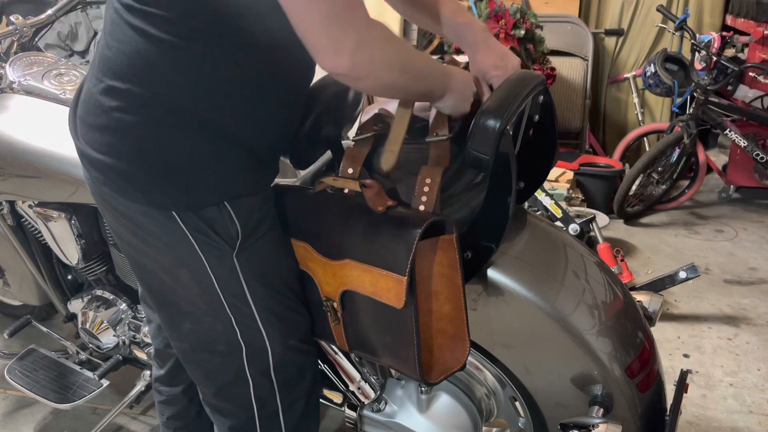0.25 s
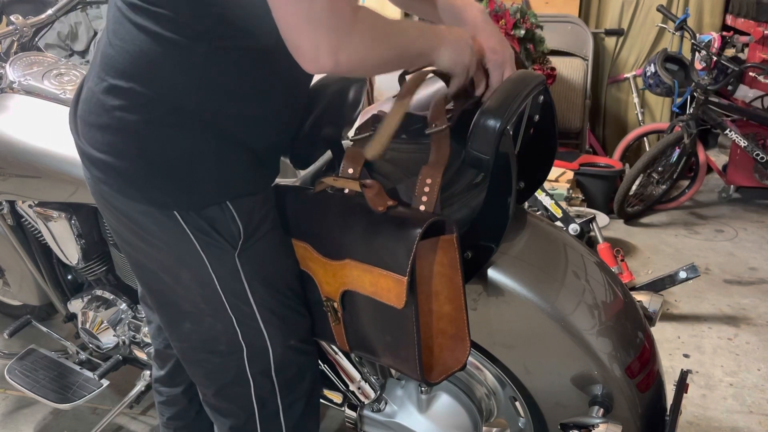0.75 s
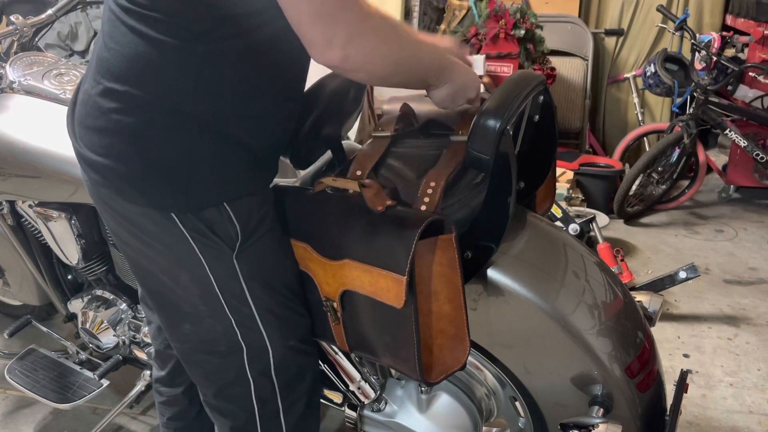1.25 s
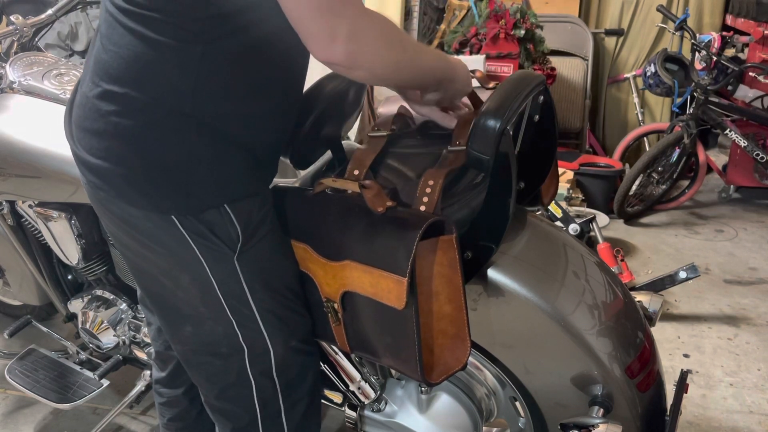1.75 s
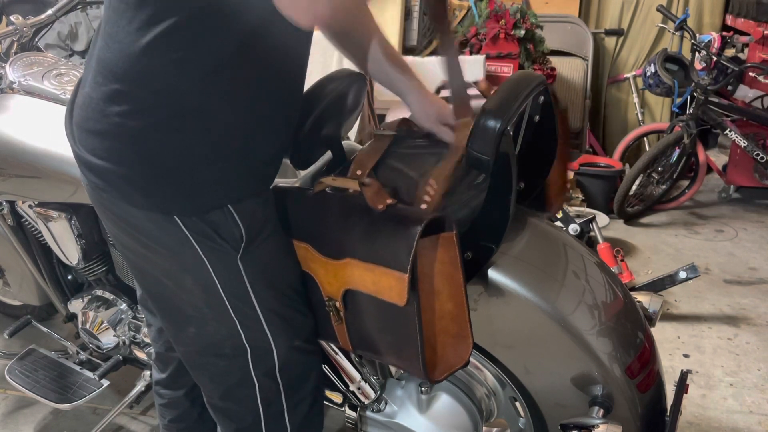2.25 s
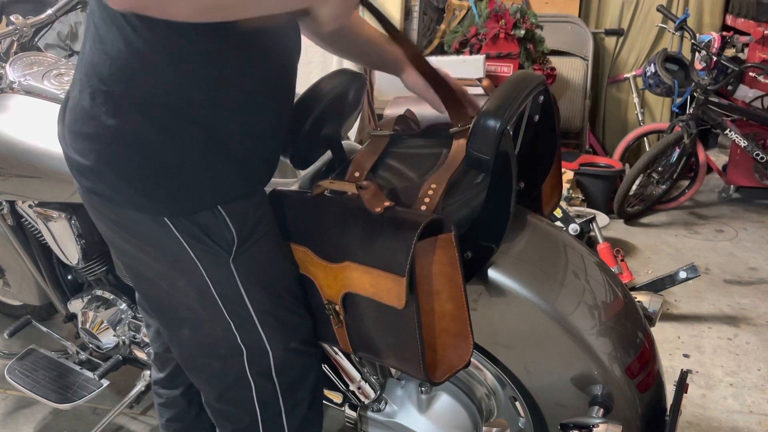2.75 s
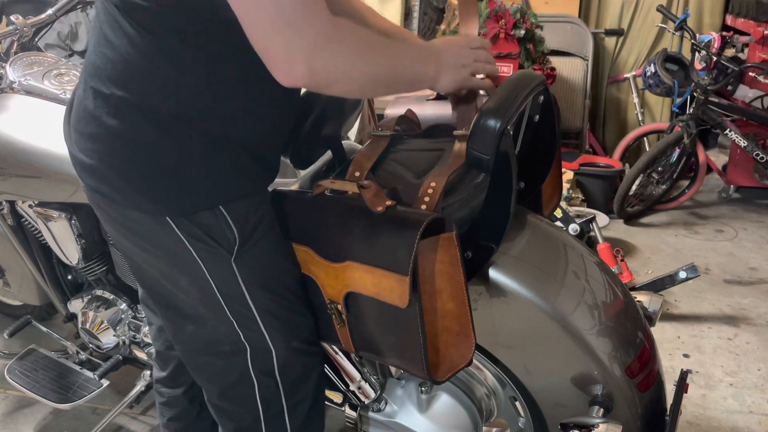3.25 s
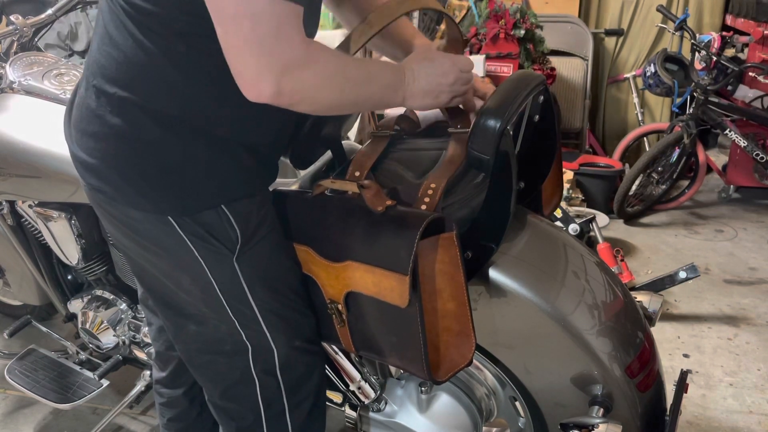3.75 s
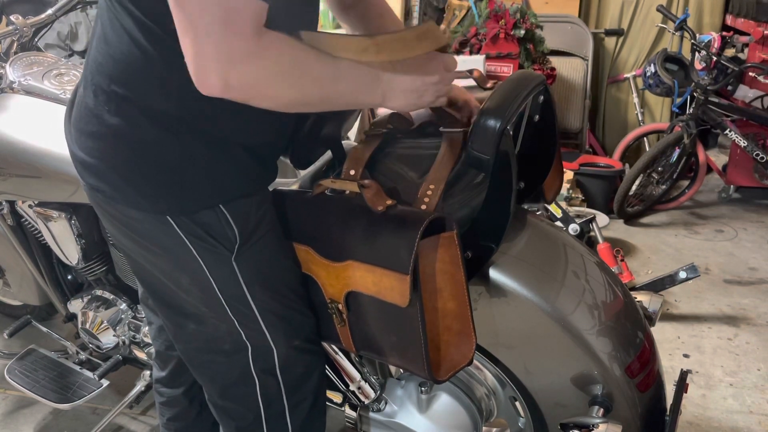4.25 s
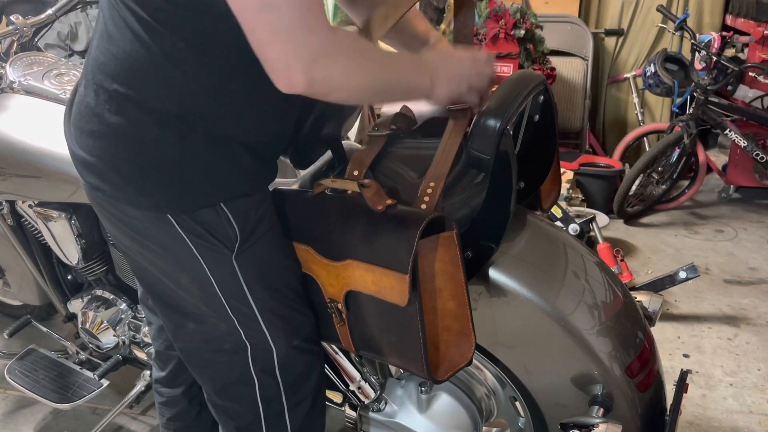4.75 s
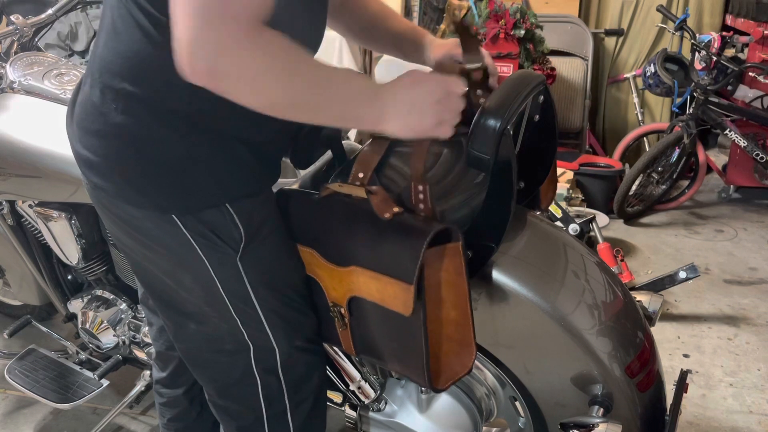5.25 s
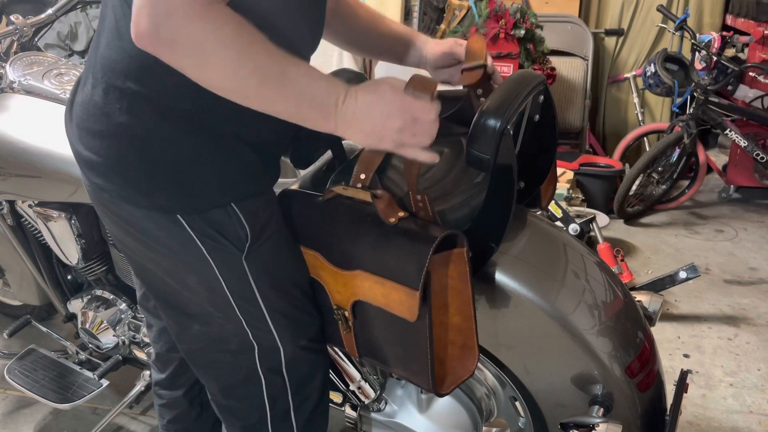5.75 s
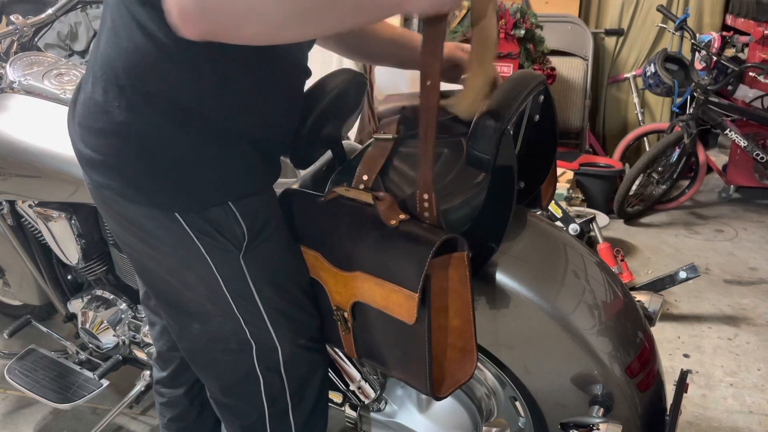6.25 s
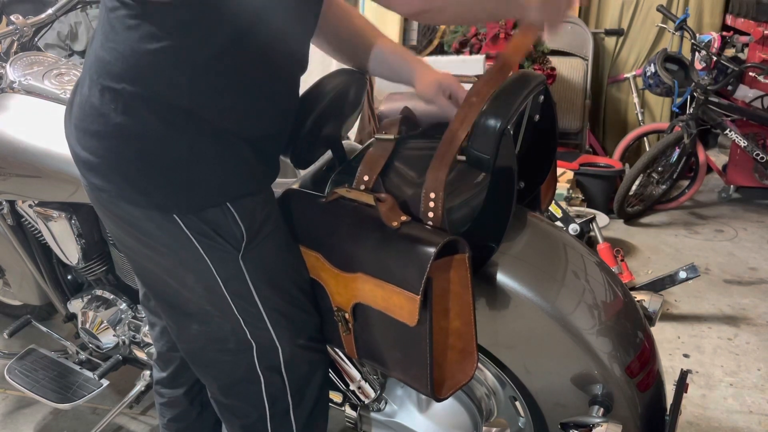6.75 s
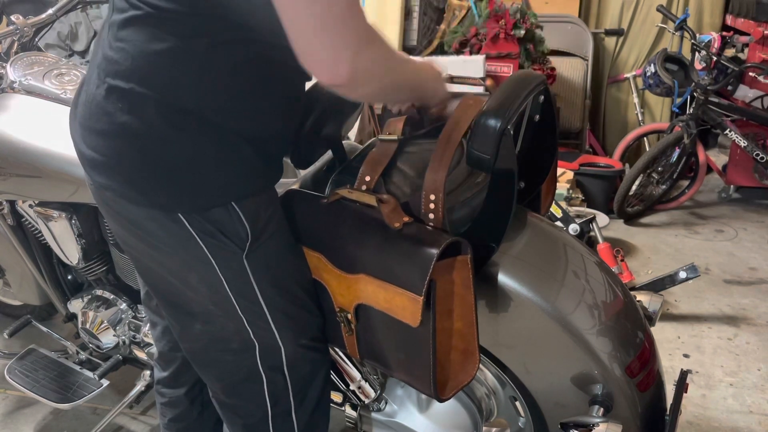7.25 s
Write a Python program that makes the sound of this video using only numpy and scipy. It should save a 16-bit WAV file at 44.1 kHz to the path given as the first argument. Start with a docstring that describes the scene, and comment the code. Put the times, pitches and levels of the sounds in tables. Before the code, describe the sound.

Soft leather rubbing and light buckle clinks open the scene, heard from a metre or two away in a quiet garage. A cluster of hollow thumps and jingles follows as the bag is handled, then dry creaks from a strap being pulled loose. Steel fittings chatter brightly before a flung buckle snaps against the bag, with a last few clinks. A faint hum lies underneath, and each sound has a short echo.

```python
"""Leather rustles and bumps softly over a faint garage hum: a bag is being unstrapped from a parked
motorcycle, a metre or two from a phone. The steel buckle rings as its tongue strikes it, the strap
creaks and rasps in stick-slip, small fittings clatter and the hollow bag thuds and slaps. Near the end
the buckle is flung against the bag with a sharp snap. The cluttered room gives each sound a short tail."""
import sys
import numpy as np
from scipy import signal
from scipy.fft import rfft, irfft
from scipy.io import wavfile

SR = 44100
rng = np.random.default_rng(int(sys.argv[2]) if len(sys.argv) > 2 else 0)


def dump(signal):
    """Clip the signal to [-1, 1] and save it as 16-bit WAV at the path in sys.argv[1]."""
    limited = np.clip(np.atleast_2d(signal).T, -1, 1)
    pcm = np.round(limited * 32767).astype(np.int16)
    wavfile.write(sys.argv[1], SR, pcm)


N = 331191
T = np.arange(N) / SR
HIT_T = T[:SR // 3]

# Levels in the tables are relative; each layer adds its own trim.
# steady tones in the room: f/Hz, level/dB
HUM = [(122.5, -82.5), (287, -91)]
# colour of the still air: f/Hz, level/dB
AIR = [(12, -38), (20, -1.5), (49, -2), (142, -10.5), (210, -15), (527, -10), (624, -16.5), (1290, -27.5),
       (3250, -33), (3950, -31), (14300, -34), (16000, -47.5)]
# leather and cloth rub as the hands work: t/s, dull rustle/dB, dry hiss/dB
RUB_LEVELS = [(0.0, -63, -67.5), (0.1, -69.5, -73), (0.23, -71, -75), (0.46, -68.5, -72),
              (0.81, -69.5, -74), (0.94, -60.5, -66.5), (1.05, -66, -75), (1.11, -55.5, -56),
              (1.29, -64, -73), (1.57, -68, -74.5), (1.82, -66.5, -68.5), (2.03, -63.5, -72),
              (2.17, -57, -53), (2.28, -44, -52), (2.32, -57.5, -58), (2.47, -60.5, -74.5),
              (2.57, -82, -69), (2.7, -72.5, -70), (2.84, -69.5, -72), (3.09, -77.5, -87),
              (3.3, -68, -74.5), (3.47, -70.5, -76), (3.68, -75, -68.5), (4.08, -62, -67.5),
              (4.22, -75.5, -74), (4.48, -70, -75), (4.79, -69, -72), (5.04, -65, -67),
              (5.17, -59.5, -51.5), (5.31, -64, -70), (5.46, -69.5, -54), (5.56, -78.5, -68),
              (5.77, -72.5, -71), (5.92, -65, -62), (6.28, -79.5, -75.5), (6.52, -63.5, -73),
              (6.67, -67, -67), (6.76, -66, -70.5), (6.86, -67.5, -61.5), (7.05, -75, -78.5),
              (7.3, -75.5, -87.5), (7.51, -87, -81)]
# colour of the flexing folds: f/Hz, level/dB
RUSTLE = [(60, -22), (150, -6), (240, -0.5), (282, 7.5), (330, -1.5), (420, -2), (700, -5), (1300, -10),
          (3000, -38)]
# colour of the scraping grain: f/Hz, level/dB
HISS = [(500, -10), (1300, -1.5), (3000, 2.5), (5000, -1), (7000, -8), (9000, -8.5), (12000, -22.5),
        (16000, -24)]
# leather and hands bump the bag: t/s, level/dB, hardness (slap over thud)/dB, thud f/Hz
BUMPS = [(0.002, -53.5, -14, 250), (0.219, -51.5, -3.5, 351), (0.412, -60.5, -21, 330),
         (0.781, -55.5, -7, 408), (0.806, -49.5, -9.5, 516), (1.096, -49.5, -1.5, 307),
         (1.146, -56, 6, 320), (1.402, -63, -21, 343), (1.771, -66, -12.5, 288), (1.924, -57.5, -13, 315),
         (2.142, -33, -2, 278), (2.152, -39.5, 9, 285), (2.167, -34, -5, 280), (2.206, -41.5, 7, 260),
         (2.232, -42, -8, 288), (3.584, -57.5, -10, 298), (3.704, -56, 3, 228), (4.143, -54, -1, 370),
         (4.593, -57.5, -9, 294), (5.039, -47, -3, 271), (5.111, -65, 15, 276), (5.286, -50, 6, 368),
         (5.351, -55.5, 1, 325), (5.625, -58.5, -16.5, 256), (6.096, -58, -6.5, 327),
         (6.232, -48, -4.5, 476), (6.264, -53.5, 5.5, 270), (6.521, -42, 2.5, 290), (6.587, -53, -8, 288),
         (6.836, -43, 8.5, 279), (7.262, -54.5, -7.5, 359)]
# modes of the bag's hollow body, then its flap: f/Hz, level/dB
BAG_MODES = [
    [(125, -11), (185, -3.5), (245, -7.5), (285, 0.5), (360, -3)],
    [(420, 3.5), (520, -6), (640, 3.5), (780, -14.5)],
]
# noise colours of body, flap and slap: f/Hz, level/dB
BAG_COLOURS = [
    [(40, -10), (110, -13), (180, -14), (270, 6), (380, -7), (600, -22.5), (1500, -48.5)],
    [(200, -15.5), (400, 5), (650, 9), (900, -11.5), (1600, -40)],
    [(450, -19), (1050, -6), (1600, -11.5), (2700, -10.5), (4200, -15.5), (10000, -26.5)],
]
# the tongue strikes the buckle frame: t/s, level/dB, brightness (top over low modes)/dB
STRIKES = [(0.004, -61.5, -1), (0.573, -54, -12), (0.588, -50, -16.5), (0.646, -56, -21),
           (0.859, -42.5, -16.5), (0.887, -41, -11), (1.034, -54.5, 2.5), (1.104, -50.5, 17),
           (1.117, -45, -13.5), (1.226, -43, -5.5), (1.261, -47, 3.5), (2.091, -66, 15), (2.151, -42.5, 2),
           (2.166, -39, 6), (2.191, -39.5, -4), (2.229, -39.5, -8), (2.25, -40.5, -19), (4.454, -74, -25.5),
           (4.505, -76, -20), (5.173, -45.5, 9), (5.882, -54, -12), (5.907, -46, -15),
           (5.928, -44.5, -14.5), (6.21, -64, -9), (6.544, -42.5, 1), (6.587, -59, -33), (6.796, -63, -9),
           (6.835, -47, -9), (6.862, -43.5, 1), (6.884, -41, -3)]
# modes of the buckle frame: f/Hz, level/dB, t60/s, group (0 low, 1 middle, 2 top)
BUCKLE_MODES = [(3957, 0, .3, 0), (4075, -14, .09, 0), (5335, -5, .35, 1), (8696, 0, .3, 1),
                (9990, -6, .3, 1), (13250, -14, .06, 2), (13750, 0, .25, 2), (14680, -8, .3, 2)]
# the strap slips once under tension: t/s, level/dB
CREAKS = [(0.056, -45), (0.096, -44), (0.1924, -44), (0.236, -51), (0.29, -52), (0.992, -44), (1.081, -47),
          (1.146, -43), (1.189, -38.5), (1.6275, -44.5), (1.9333, -42.5), (1.973, -38), (2.044, -41),
          (2.1216, -40), (2.1289, -29.5), (2.7684, -48.5), (2.798, -45), (2.8461, -45), (3.021, -50),
          (3.068, -43), (3.205, -45.5), (3.262, -40), (3.309, -47.5), (3.4376, -47), (3.465, -47),
          (3.5226, -29.5), (3.585, -24.5), (3.866, -46.5), (3.983, -31.5), (4.153, -40), (4.2582, -47),
          (4.7362, -48)]
# a steady pull makes it slip again and again: t/s, length/s, level/dB
PULLS = [(2.415, .085, -39), (3.889, .085, -38)]
# colour of a slip's dry tick: f/Hz, level/dB
SLIP_TICK = [(900, -48), (2200, -3), (4200, 5), (6500, -6.5), (8500, -7), (11000, -16), (15500, -28)]
# colour of the stiff strap's knock: f/Hz, level/dB
SLIP_BODY = [(150, -31), (350, -1), (700, -2), (1200, 1), (2200, -4.5), (4000, -20.5)]
# strap fittings knock together: t/s, level/dB, brightness/dB, clink f/Hz
CLACKS = [(0.5885, -43.5, -5, 5030), (0.861, -42, 2, 4300), (0.89, -47, 6, 4430), (1.0053, -53, -9, 4600),
          (1.119, -49.5, 6, 4400), (2.091, -51, 0, 4730), (2.165, -35.5, 1.5, 4230), (2.174, -51, 19, 4500),
          (2.208, -30.5, 5.5, 4160), (4.857, -46, -9, 4130), (4.9995, -36.5, 0.5, 5000),
          (5.027, -31, -29, 5030), (5.037, -45, 1.5, 5500), (5.044, -29.5, -5.5, 5080),
          (5.05, -33.5, 5, 5740), (5.103, -29.5, 6, 4500), (5.112, -32, 6, 5140), (5.127, -40, -18, 5100),
          (5.138, -30, 5, 4580), (5.172, -40.5, 9, 4870), (5.193, -31, 5, 4470), (5.203, -31.5, 2, 4900),
          (5.2385, -35.5, -5, 4990), (5.395, -38.5, -11, 4900), (5.404, -36, -19, 5260),
          (5.412, -28, -5.5, 5010), (5.45, -37.5, 1, 4930), (5.4595, -31, -17, 4910),
          (5.7544, -38.5, -10, 5130), (5.769, -57, 4, 5200), (5.841, -55, 4, 5280),
          (5.909, -42.5, 5.5, 4150), (6.591, -38, -4, 4090), (6.837, -37, 3.5, 4270)]
# loose fittings chatter: t/s, length/s, level/dB, clink f/Hz
RATTLES = [(2.15, .08, -56, 4280), (5.066, .155, -42, 4900), (5.416, .05, -50, 5230),
           (6.53, .05, -41, 4100)]
# a knock's four bands (crunch, clink, bright, top): level/dB, dB gained per dB of brightness
CLACK_BANDS = [(-13, -0.1), (5, 0), (-4.5, 0.45), (-12.5, 1.83)]
# modes of the fittings in each band: f/Hz, level/dB
FITTING_MODES = [
    [(1850, -6.5), (2350, -15.5), (3300, -8)],
    [(4150, -40.5), (4680, -63), (4930, 4.5), (5140, 6), (5470, 15), (6050, -7)],
    [(7950, -1.5), (8520, 22), (8780, 17), (9350, -20)],
    [(13250, -11.5), (13770, 17), (14200, -10), (14750, -8)],
]
# colour of the contact grit in each band: f/Hz, level/dB
GRIT = [
    [(400, -33.5), (1000, -1.5), (3000, -17), (4500, -10)],
    [(2600, -27), (4100, -8.5), (5200, 5), (6200, -4), (7500, -22)],
    [(5500, -24.5), (7800, 3), (8800, 5), (10000, -8.5), (12500, -37.5)],
    [(9000, -8.5), (12000, 4), (13800, -5.5), (16000, -36)],
]
# the strap drags through its keeper: t/s, length/s, level/dB, slips per s
DRAGS = [(1.652, 0.14, -61, 115), (4.303, 0.22, -73, 160)]
# colour of the strap's rasp: f/Hz, level/dB
RASP = [(1200, -13), (1800, -1), (2150, -15), (3200, 2.5), (4000, -10), (5900, -1), (6600, -16),
        (8600, -12), (15000, -45)]
# the flung buckle lands and chatters: t/s, level/dB
SNAPS = [(6.5223, -17), (6.5239, -10), (6.5251, -23)]
# colour of steel on steel: f/Hz, level/dB
STEEL_SNAP = [(300, -14.5), (1100, -9), (2000, -25.5), (5000, -4), (7000, -10.5), (8700, -0.5),
              (11000, -14.5), (13500, 6), (15500, -14)]
# decay of the garage: f/Hz, t60/s
GARAGE_T60 = [(125, 1), (500, 0.54), (2000, 0.27), (5000, 0.29), (9000, 0.2656), (15000, 0.25)]

CLINK_HZ, THUD_HZ = 5100, 285  # pitches at which the mode tables play untransposed


def undb(db):
    """Decibels to gain."""
    return 10 ** (np.asarray(db) / 20)


def unit(x):
    """Scale to rms 1."""
    return x / np.sqrt(np.mean(x ** 2))


def unit_attack(x, length_s=0.0073):
    """Scale so that the first milliseconds have rms 1."""
    return x / np.sqrt(np.mean(x[:int(length_s * SR)] ** 2))


def at_hz(points, hz):
    """Read (Hz, value) points on a log-frequency axis."""
    f, value = np.transpose(points)
    return np.interp(np.log(np.maximum(hz, 1)), np.log(f), value)


def pitched(points, ratio):
    """Transpose (Hz, dB) points by a ratio."""
    return [(hz * ratio, db) for hz, db in points]


def colour(x, points, size=2048):
    """Minimum-phase EQ through (Hz, dB) points."""
    cepstrum = irfft(np.log(undb(at_hz(points, np.fft.rfftfreq(size, 1 / SR)))))
    cepstrum[1:size // 2] *= 2
    cepstrum[size // 2 + 1:] = 0
    return signal.fftconvolve(x, irfft(np.exp(rfft(cepstrum))))[:len(x)]


def wander(rate):
    """Smooth random drift with a spread near 1."""
    return np.interp(T * rate, np.arange(N), rng.standard_normal(N))


def add(track, s, sound):
    """Mix a sound in at time s."""
    i = max(0, int(s * SR))
    track[i:i + len(sound)] += sound[:N - i]


def fade(t60):
    """Exponential decay over the length of one hit."""
    return np.exp(-np.log(1000) * HIT_T / t60)


def press(rise_s):
    """A cushioned contact takes a moment to reach full force."""
    return 1 - np.exp(-HIT_T / rise_s)


def burst(points, t60):
    """A contact: coloured, decaying noise with the energy of its envelope."""
    shaped = colour(rng.standard_normal(len(HIT_T)) * fade(t60), points)
    return shaped * np.linalg.norm(fade(t60)) / np.linalg.norm(shaped)


def mode(hz, t60):
    """One decaying vibration, starting from rest."""
    return rng.choice([-1, 1]) * np.sin(2 * np.pi * hz * HIT_T) * fade(t60)


def clang(modes, t60, detune, scatter_db):
    """A set of (Hz, dB) modes, detuned and weighted anew by each blow."""
    ring = 0
    for hz, db in modes:
        gain = undb(db + scatter_db * rng.standard_normal())
        ring += gain * mode(hz * (1 + detune * rng.standard_normal()), t60)
    return unit_attack(ring)


def uneven_times(length, gap_s, jitter):
    """Times of an unevenly repeating contact, from 0 up to length s."""
    gaps = gap_s * np.exp(jitter * rng.standard_normal(size=100))
    times = np.cumsum(gaps) - gaps[0]
    return times[times < length]


def grains(rate, spread_db):
    """Tiny random slips, mostly weak and a few stronger."""
    impulses = (rng.random(N) < rate / SR) * rng.choice([-1, 1], N)
    return impulses * undb(spread_db * np.minimum(rng.exponential(size=N), 5))


def room_tone(air_db=-72, waver_db=2):
    """The bed: still air and a faint wavering hum."""
    hum = sum(undb(db + waver_db * wander(4.3)) * unit(np.sin(2 * np.pi * hz * T + wander(1.6)))
              for hz, db in HUM)
    return hum + undb(air_db) * unit(colour(rng.standard_normal(N), AIR))


def rubbing(rustle_db=-1, hiss_db=1, uneven_db=3.5):
    """Folds flex with a dull rustle while the leather's grain scrapes, both in fits and starts."""
    times, rustle, hiss = np.transpose(RUB_LEVELS)
    fits_db = uneven_db * wander(35)
    folds = unit(colour(grains(rate=350, spread_db=0.5), RUSTLE))
    folds *= undb(np.interp(T, times, rustle) + rustle_db + fits_db)
    scrape = unit(colour(grains(rate=1400, spread_db=1.5), HISS))
    scrape *= undb(np.interp(T, times, hiss) + hiss_db + fits_db)
    return folds + scrape


def bumps(hollow_db=-3, flap_db=-4, crumple_db=-5, hollow_t60=0.063, flap_t60=0.034):
    """The bag thuds at a pitch set by where it is hit, its flap knocks; harder blows slap more."""
    out = np.zeros(N)
    for s, blow_db, hard_db, hz in BUMPS:
        slap = undb(hard_db / 2) * burst(BAG_COLOURS[2], t60=0.071)
        hollow = (hollow_db - hard_db / 2, hollow_t60, hz / THUD_HZ)
        flap = (flap_db, flap_t60, 1)
        thud = 0
        for (db, t60, ratio), modes, outline in zip((hollow, flap), BAG_MODES, BAG_COLOURS):
            tone = clang(pitched(modes, ratio), t60, detune=0.075, scatter_db=3)
            crumple = undb(crumple_db) * burst(pitched(outline, ratio), t60)
            thud += undb(db) * (tone + crumple)
        add(out, s, undb(blow_db) * press(rise_s=0.0007) * (slap + thud))
    return out


def buckle(low_db=3, middle_db=-2, top_db=5.5, free_s=0.023, choke_db=-20, pivot_hz=8000, detune=0.001):
    """The frame rings, bright or dull by where it is struck, then falls back on the damping leather."""
    out = np.zeros(N)
    resting = 1 / (1 + (free_s / (HIT_T + 1 / SR)) ** 4)
    for s, strike_db, bright_db in STRIKES:
        gains = undb(strike_db + np.array([low_db - bright_db / 2, middle_db, top_db + bright_db / 2]))
        ring = 0
        for hz, db, t60, group in BUCKLE_MODES:
            choke = undb(choke_db * (hz / pivot_hz) ** 0.53 * resting)  # high modes lose most
            partial = mode(hz * (1 + detune * rng.standard_normal()), t60)
            ring += gains[group] * undb(db) * choke * partial
        add(out, s, press(rise_s=0.0003) * ring)
    return out


def tongue(click_db=-2, tick_db=-8):
    """Each strike on the buckle opens with a short steel click, strongest on the dull strikes."""
    out = np.zeros(N)
    for s, db, bright_db in STRIKES:
        click = undb(click_db - bright_db / 3) * burst(GRIT[1], t60=0.014)
        tick = undb(tick_db) * burst(STEEL_SNAP, t60=0.0062)
        add(out, s, undb(db) * (click + tick))
    return out


def slip(db, tick_db=-5, knock_db=-29, knock_growth=0.64):
    """A dry tick with a little knock from the stiff strap; the knock grows more slowly than the tick."""
    tick = undb(db + tick_db) * burst(SLIP_TICK, t60=0.01)
    knock = undb(knock_growth * db + knock_db) * burst(SLIP_BODY, t60=0.027)
    return tick + knock


def creaks(strays=28, stray_db=11, scatter_db=3):
    """Single slips, runs of slips under a steady pull, and faint strays that ride the rubbing level."""
    out = np.zeros(N)
    for s, db in CREAKS:
        add(out, s, slip(db))
    for s, length, db in PULLS:
        for t in uneven_times(length, gap_s=0.0187, jitter=0.02):
            add(out, s + t, slip(db))
    times, _, hiss = np.transpose(RUB_LEVELS)
    for s in rng.uniform(0, T[-1], strays):
        add(out, s, slip(np.interp(s, times, hiss) + stray_db + scatter_db * rng.standard_normal()))
    return out


def clack(bright_db, clink_hz, clink_db=-4, grit_db=-5):
    """Small steel parts, damped by the strap: grit and a brief clink pitched by the parts that meet."""
    out = 0
    ratios = (1, clink_hz / CLINK_HZ, 1, 1)
    for (db, slope), modes, outline, ratio in zip(CLACK_BANDS, FITTING_MODES, GRIT, ratios):
        clink = undb(clink_db) * clang(pitched(modes, ratio), t60=0.012, detune=0.01, scatter_db=4)
        grit = undb(grit_db) * unit_attack(burst(pitched(outline, ratio), t60=0.018))
        out += undb(db + slope * bright_db) * (clink + grit)
    return press(rise_s=0.001) * out


def fittings(chatter_db=-2, scatter_db=4):
    """Strap fittings knock together, with loose chatter between the knocks."""
    out = np.zeros(N)
    for s, db, bright_db, hz in CLACKS:
        add(out, s, undb(db) * clack(bright_db, hz))
    for s, length, db, hz in RATTLES:
        for t in uneven_times(length, gap_s=0.018, jitter=0.56):
            gain = undb(db + chatter_db + scatter_db * rng.standard_normal())
            add(out, s + t, gain * clack(bright_db=5, clink_hz=hz))
    return out


def drags(scatter_db=1.5):
    """The strap rasps through its keeper: a quick run of stick-slip pulses that swells and fades."""
    out = np.zeros(N)
    for s, length, db, rate in DRAGS:
        run = np.zeros(N)
        for t in uneven_times(length, gap_s=1 / rate, jitter=0.12):
            swell = np.sqrt(np.sin(np.pi * t / length))
            add(run, s + t, swell * undb(scatter_db * rng.standard_normal()) * burst(RASP, t60=0.0055))
        out += undb(db) * np.sqrt(length * SR) * run / np.linalg.norm(run)
    return out


def snaps(trim_db=-4):
    """The flung buckle: steel hits steel hard, three contacts within milliseconds."""
    out = np.zeros(N)
    for s, db in SNAPS:
        add(out, s, undb(db + trim_db) * burst(STEEL_SNAP, t60=0.0077))
    return out


def garage(dry, wet_db, treble_db, build_s):
    """Scattered reflections build up within milliseconds and fade, the treble soonest."""
    t = T[:SR * 3 // 4]
    hz = np.fft.rfftfreq(len(t), 1 / SR)
    noise = rfft(rng.standard_normal(len(t)))
    centres, t60s = np.transpose(GARAGE_T60)
    tail = 0
    for weights, t60 in zip(np.eye(len(t60s)), t60s):
        band = irfft(noise * at_hz(np.c_[centres, weights], hz), len(t))
        tail += band * np.exp(-np.log(1000) * t / t60)
    build = 1 - np.exp(-(t / build_s) ** 2)
    tail = colour(tail * build, [(1000, 0.005), (14000, treble_db)])
    return dry + undb(wet_db) * signal.fftconvolve(dry, tail / np.linalg.norm(tail))[:N]


def scene():
    """Four buses, one room: the buckle's ring and the clicks sound drier, the fittings wetter."""
    chime = garage(buckle(), wet_db=-6, treble_db=3, build_s=0.0026)
    rattle = garage(fittings() + tongue(), wet_db=-1.5, treble_db=4.5, build_s=0.0022)
    leather = garage(bumps() + rubbing(), wet_db=-9, treble_db=-1, build_s=0.005)
    clicks = garage(creaks() + drags() + snaps(), wet_db=-7, treble_db=0, build_s=0.0049)
    return (chime + rattle + leather + clicks + room_tone())[None]


def record(dry, top_hz=15800):
    """The phone cuts the top end steeply."""
    return signal.sosfilt(signal.ellip(8, .2, 70, top_hz, fs=SR, output="sos"), dry)


dry = scene()
out = record(dry)
dump(out)
```